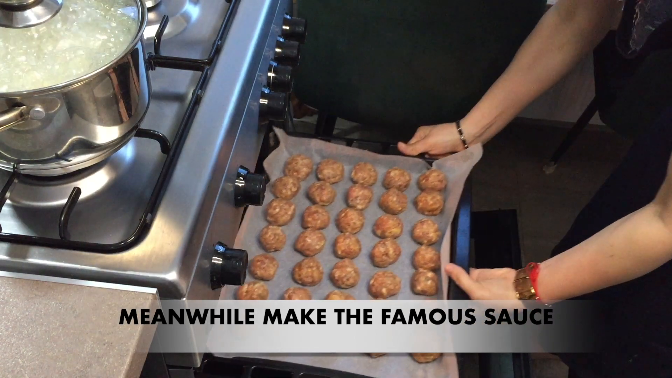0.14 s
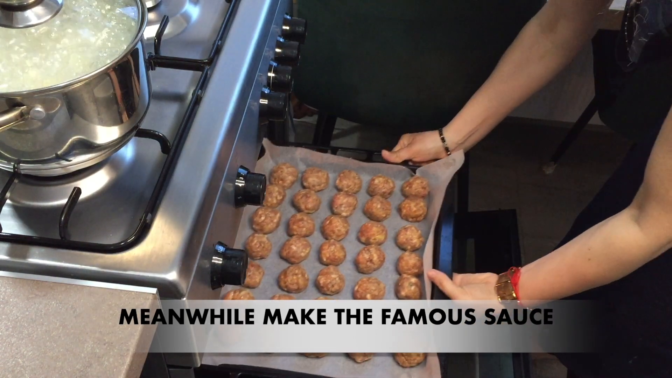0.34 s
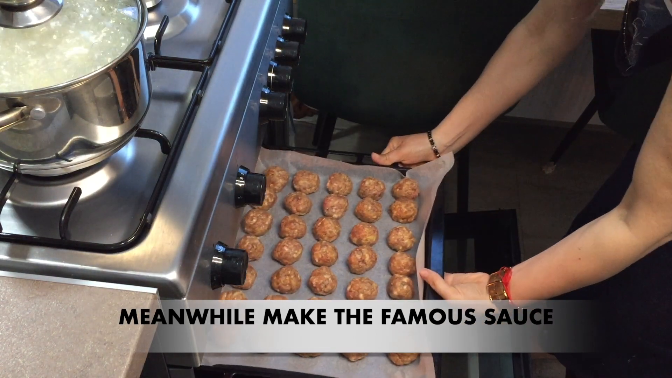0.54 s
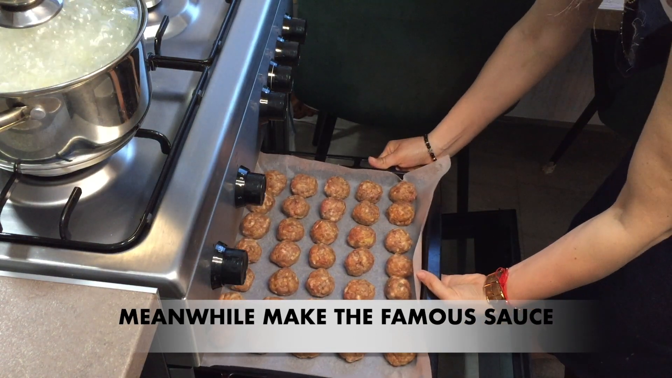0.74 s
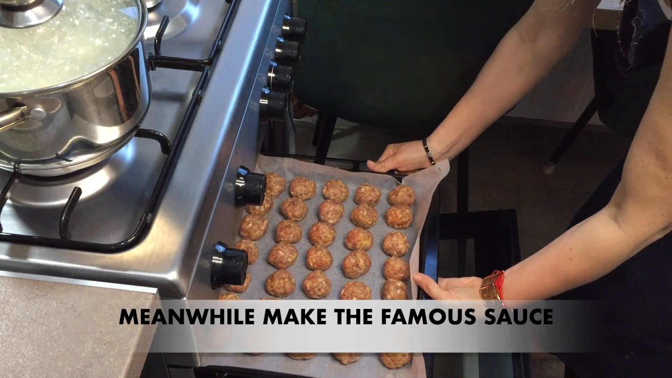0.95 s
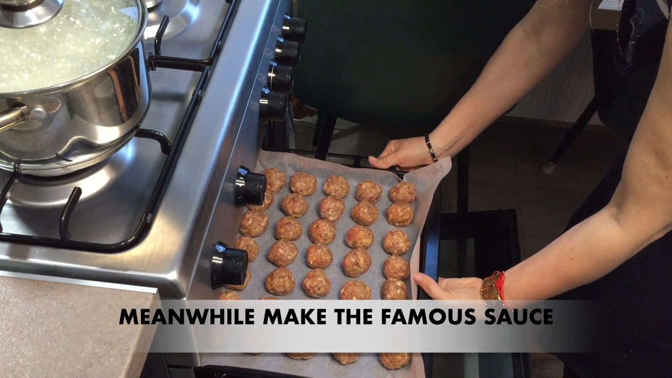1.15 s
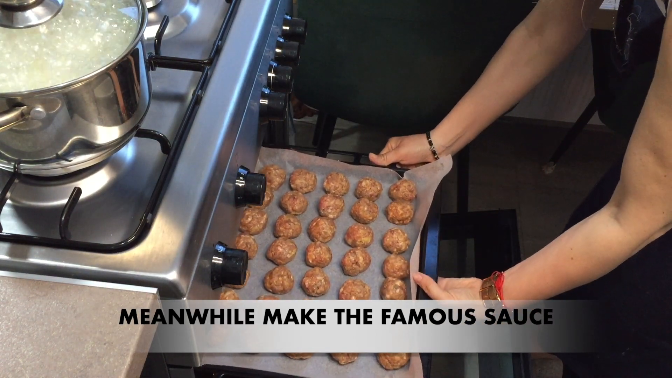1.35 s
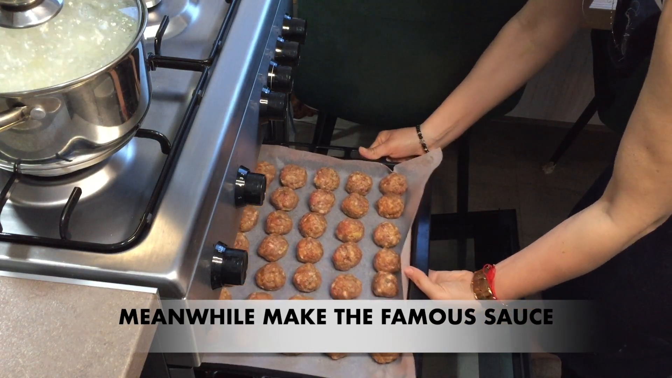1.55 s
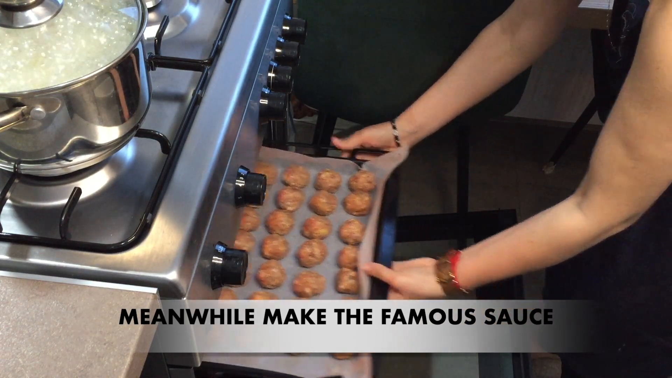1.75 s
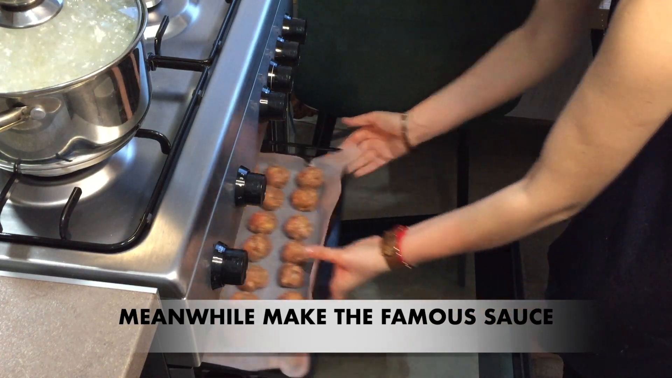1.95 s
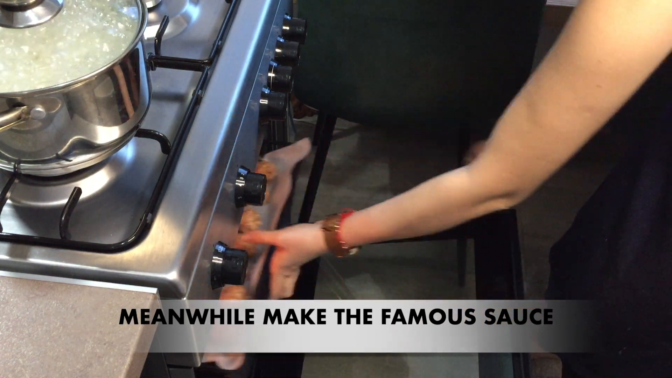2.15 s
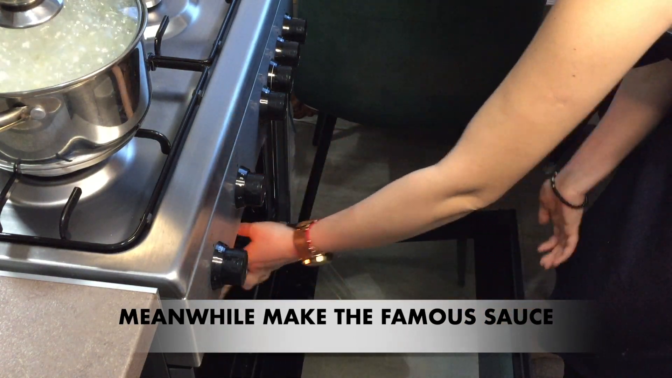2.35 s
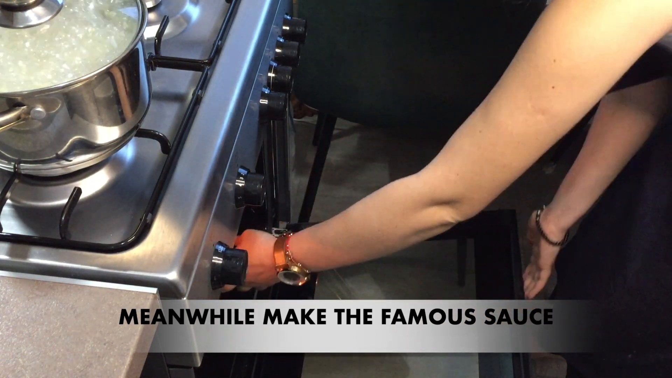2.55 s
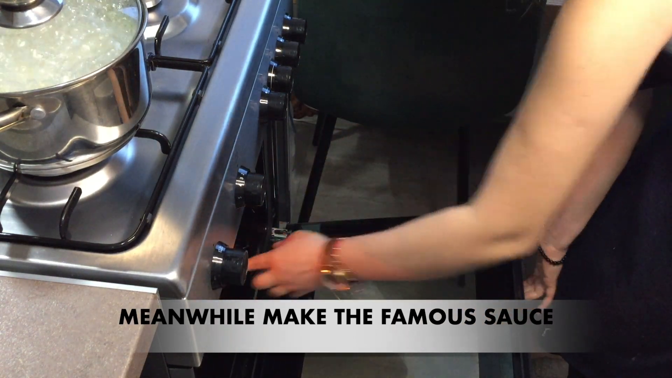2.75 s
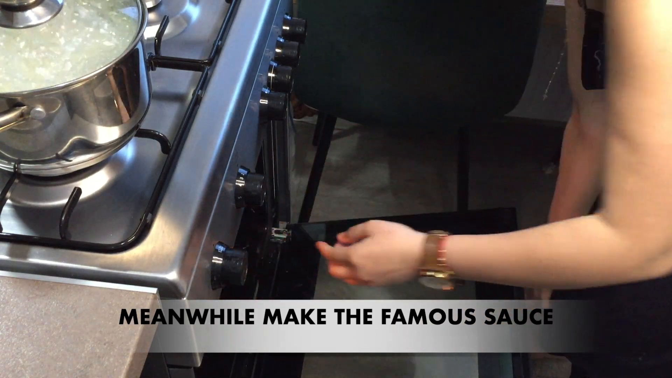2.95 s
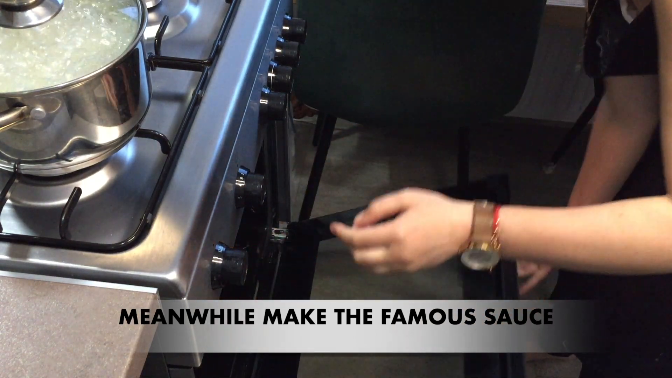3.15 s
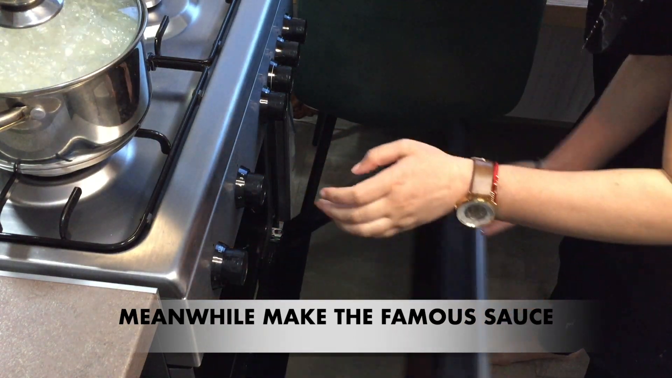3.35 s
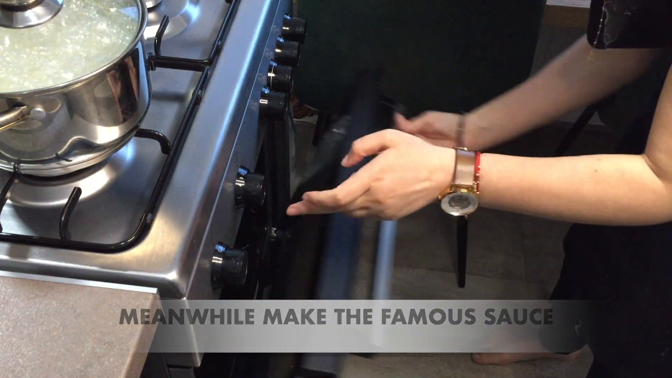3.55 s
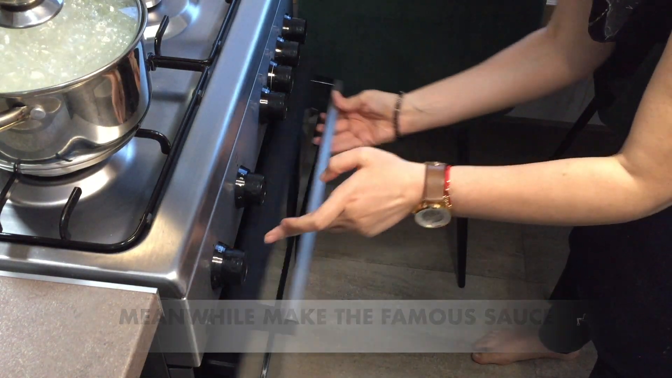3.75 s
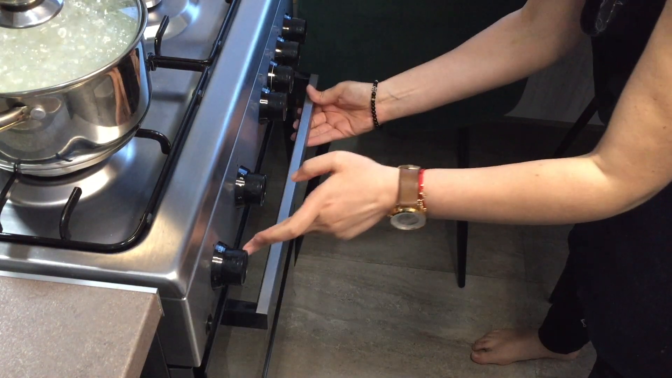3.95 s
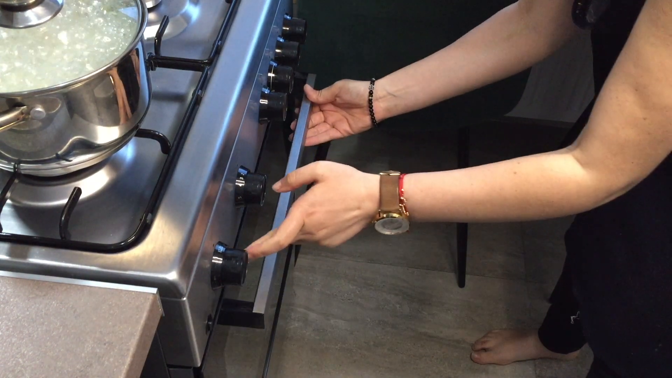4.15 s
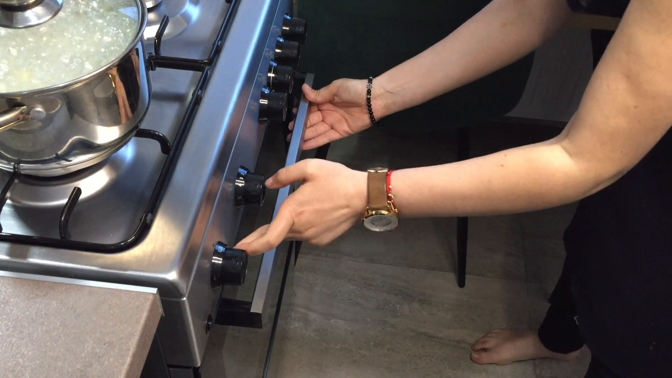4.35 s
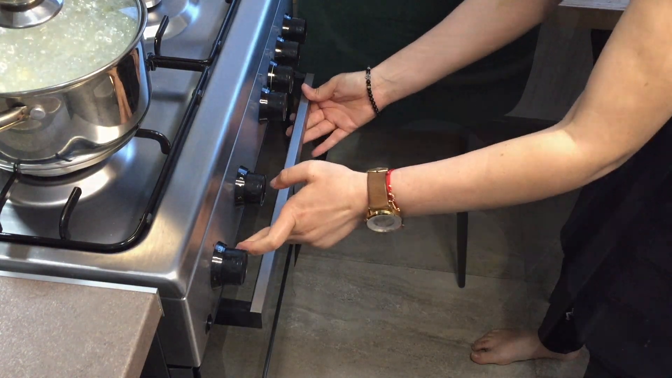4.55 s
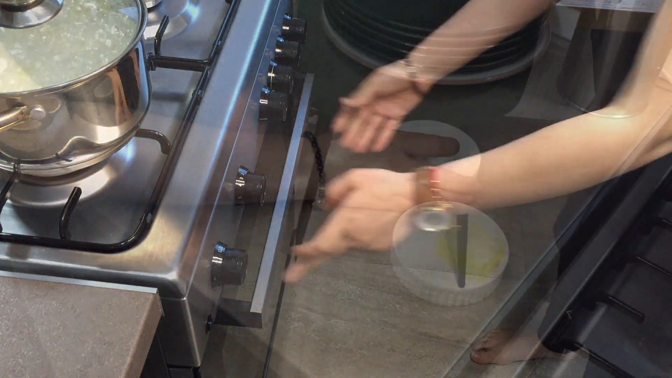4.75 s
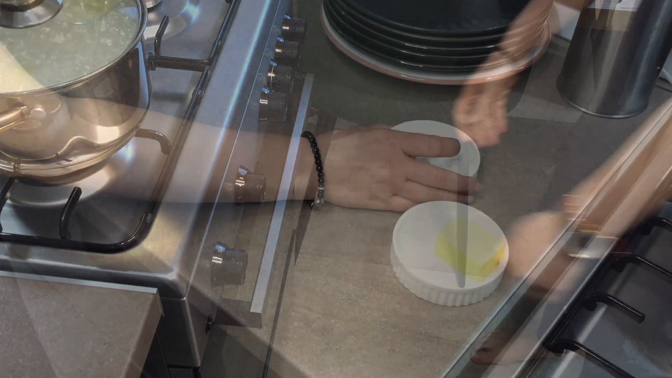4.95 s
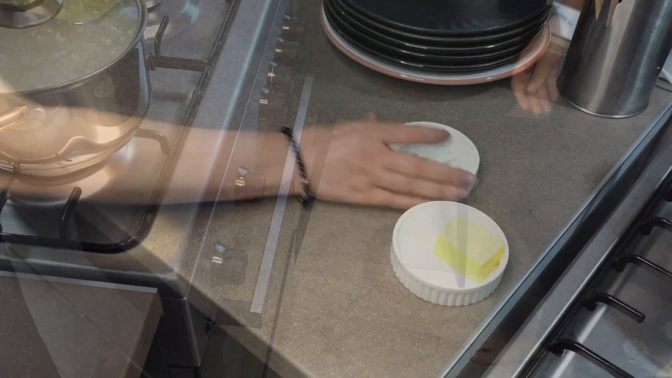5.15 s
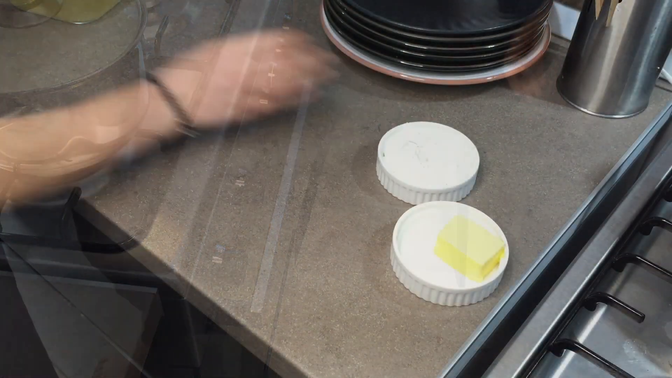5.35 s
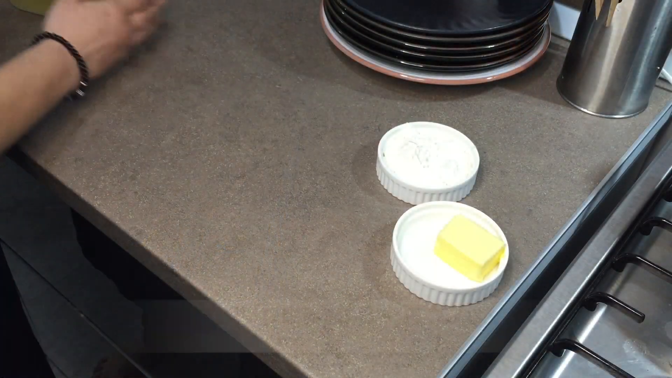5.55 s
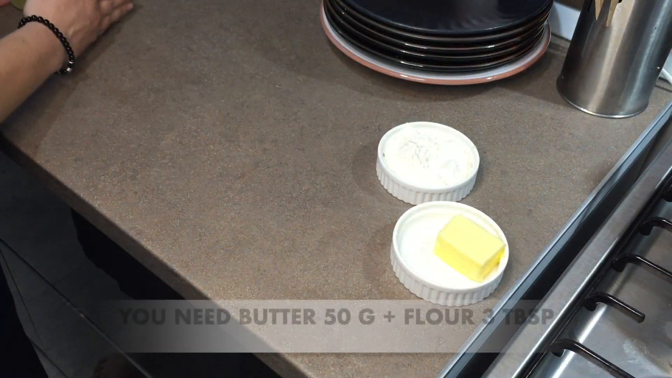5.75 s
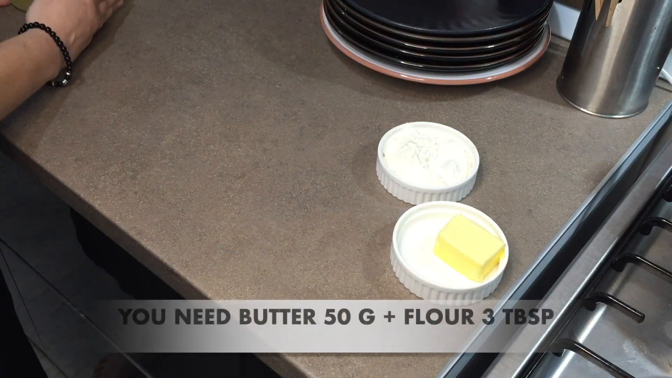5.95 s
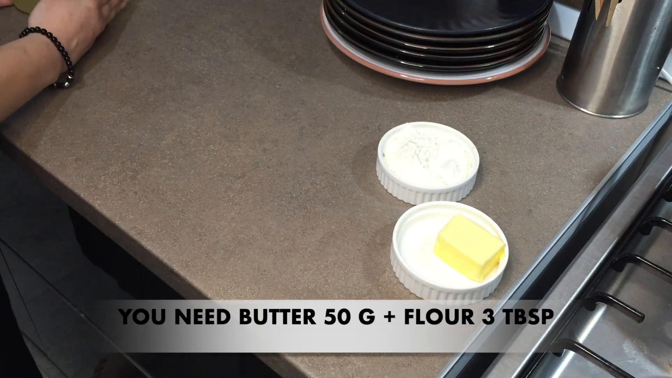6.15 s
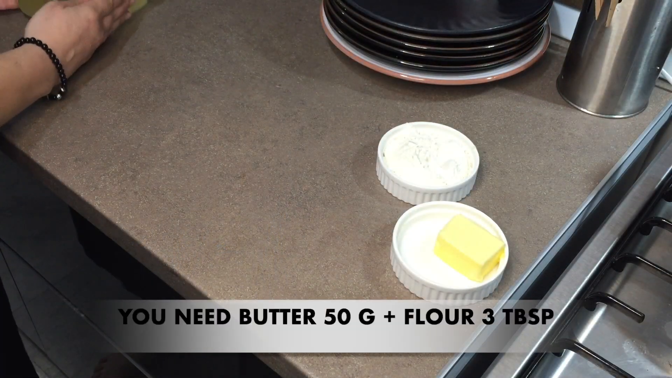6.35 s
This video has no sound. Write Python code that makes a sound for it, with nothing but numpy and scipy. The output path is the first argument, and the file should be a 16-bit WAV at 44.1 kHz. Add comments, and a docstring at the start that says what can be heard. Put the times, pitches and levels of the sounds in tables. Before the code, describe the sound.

A steel baking tray knocks and scrapes along an oven rack, ringing and squeaking faintly as it slides in. The hinge rubs briefly, the door thuds shut and its catch clanks. A plastic knob clicks twice, then a low electrical hum fades in, with a faint brush of a hand and a small dish nudged on the counter. One microphone picks it up in a hard-walled kitchen with a soft background hiss.

```python
"""Baking tray into the oven

A steel tray knocks, scrapes and faintly squeaks along the rack, ringing its sheet and the oven box.
The hinge rubs, the door thuds shut, its catch clanks and a knob clicks twice. Mains hum fades in
over the kitchen's murmur; a hand brushes the counter and a small dish is nudged, with a faint click.
One microphone, hard walls."""
import sys
import numpy as np
from scipy import signal
from scipy.fft import rfft, irfft, next_fast_len
from scipy.io import wavfile
from scipy.ndimage import uniform_filter1d, map_coordinates

SR = 44100
rng = np.random.default_rng(int(sys.argv[2]) if len(sys.argv) > 2 else 0)


def dump(signal):
    """Clip the signal to [-1, 1] and save it as 16-bit WAV at the path in sys.argv[1]."""
    limited = np.clip(np.atleast_2d(signal).T, -1, 1)
    pcm = np.round(limited * 32767).astype(np.int16)
    wavfile.write(sys.argv[1], SR, pcm)


N = 282989

# oven box modes: f/Hz, width/Hz, level/dB
OVEN_MODES = [(103, 11.7, 4.5), (139.6, 12, 1.5), (189.4, 12, -1), (272, 89, -3), (365.7, 10.7, -1.5)]


def amp(db):
    """dB to gain."""
    return 10 ** (np.asarray(db) / 20)


def unit(x):
    """Scale to rms 1."""
    return x / np.sqrt(np.mean(x ** 2) + 1e-20)


def along(points, hz):
    """Interpolate (f/Hz, value) points on a log axis."""
    f, v = np.transpose(points)
    return np.interp(np.log(hz + 1), np.log(f + 1), v)


def wobble(rate_hz):
    """Smooth random curve, rate_hz knots a second."""
    knots = rng.standard_normal(int(N * rate_hz / SR) + 4)
    return map_coordinates(knots, [np.arange(N) * rate_hz / SR])


def envelope(start_s, length_s, rise_s, fall_s):
    """Linear rise, hold, exponential release."""
    t = np.arange(N) / SR - start_s
    return np.clip(t / rise_s, 0, 1) * np.exp(-np.clip(t - length_s, 0, None) / fall_s)


def filtered(x, response):
    """Apply a complex frequency response."""
    m = next_fast_len(x.shape[-1] + SR // 2)
    return irfft(rfft(x, m) * response(np.fft.rfftfreq(m, 1 / SR)), m)[..., :x.shape[-1]]


def resonances(peaks):
    """Response of (f/Hz, width/Hz, level/dB) resonators, alternating in sign."""
    return lambda f: sum((-1) ** k * amp(db) * 1j * f * w / (c * c - f * f + 1j * f * w)
                         for k, (c, w, db) in enumerate(peaks))


def minimum_phase(gain):
    """Shortest impulse response with this gain on an FFT grid."""
    cepstrum = irfft(np.log(gain + 1e-6))
    half = len(cepstrum) // 2
    cepstrum[1:half] *= 2
    cepstrum[half + 1:] = 0
    return irfft(np.exp(rfft(cepstrum)))


def dying_noise(gain, t60_s, size):
    """Coloured noise; each octave decays at its own rate."""
    hz, t = np.fft.rfftfreq(size, 1 / SR), np.arange(size) / SR
    centres_hz = 62.5 * 2. ** np.arange(9)
    share = np.clip(1 - abs(np.log2((hz + 1) / centres_hz[:, None])), 0, 1)
    bands = irfft(rfft(rng.standard_normal(size)) * gain(hz) * share, size)
    return np.sum(bands * amp(-60 * t / t60_s(centres_hz)[:, None]), axis=0)


def patchy(x, depth_db):
    """Random patches of gain over time and frequency."""
    z = signal.stft(x, nperseg=512)[2]
    field = uniform_filter1d(rng.standard_normal(z.shape), size=5, axis=-2)
    field = uniform_filter1d(field, size=10, axis=-1)
    return signal.istft(z * amp(depth_db * unit(field)), nperseg=512)[1][..., :N]


def position(start_s=4.32, length_s=0.97):
    """Listener's move: 0 by the stove, 1 by the counter."""
    return np.clip((np.arange(N) / SR - start_s) / length_s, 0, 1)


def coupling_db(s, mouth_db=-6, enter_s=1.23, length_s=0.39):
    """The lowest box modes speak less while the tray is at the oven's mouth."""
    return mouth_db * (1 - np.clip((s - enter_s) / length_s, 0, 1))


def kitchen(x, wet_db):
    """Add wall reverberation; things move, so each 0.2 s gets a new tail."""
    # room decay: f/Hz, t60/s
    room_t60 = [(100, 0.97), (500, 0.73), (2000, 0.68), (6000, 0.48), (14000, 0.21)]
    step, predelay, wet = SR // 5, 90, np.zeros(N + 2 * SR)
    for start in range(0, N, step):
        block = x[start:start + step]
        if block.any():
            impulse = dying_noise(np.ones_like, lambda hz: along(room_t60, hz), size=28800)
            tail = signal.fftconvolve(block, impulse / np.linalg.norm(impulse))
            wet[start + predelay:][:len(tail)] += tail
    return x + amp(wet_db) * wet[:N]


def murmur(stove_db=-57, counter_db=-60.5, settle_s=0.13):
    """Gas and simmering by the stove give way to a thinner hush by the counter."""
    # air by the stove: f/Hz, density/dB
    stove_spectrum = [(25, -30), (45, -2), (80, -8), (135, 1.5), (206, -11), (301, -5.5), (451, -17.5),
                      (624, -12), (1290, -14), (2600, -21.5), (3600, -32.5), (7000, -38.5), (16000, -47.5)]
    # air by the counter: f/Hz, density/dB
    hush_spectrum = [(25, -22), (55, -3), (250, -8.5), (450, -14), (1050, -8.5), (1400, -14.5),
                     (2500, -21.5), (4200, -35), (16000, -42)]
    stove_noise, hush_noise = patchy(rng.standard_normal((2, N)), depth_db=1.4)
    gas = unit(filtered(stove_noise, lambda hz: amp(along(stove_spectrum, hz))))
    gas *= amp(stove_db - 2 * np.exp(-np.arange(N) / SR / settle_s))
    hush = amp(counter_db) * unit(filtered(hush_noise, lambda hz: amp(along(hush_spectrum, hz))))
    return np.sqrt(1 - position()) * gas + np.sqrt(position()) * hush


def hum(hum_hz=100, octave_db=-59, drone_db=-54.5):
    """Twice the mains frequency and its octave, unsteady, over a low lumpy drone."""
    # fundamental's swell: t/s, level/dB
    swell = [(4.25, -67), (4.45, -52), (4.8, -48), (5.6, -53.5), (6.42, -50.5)]
    t = np.arange(N) / SR
    times_s, levels_db = np.transpose([(swell[0][0] - .1, -90)] + swell)
    phase = 2 * np.pi * hum_hz * t + .3 * wobble(5)
    fundamental = amp(np.interp(t, times_s, levels_db) + wobble(12)) * np.sin(phase)
    octave = position() * amp(octave_db + 1.6 * wobble(10)) * np.sin(2 * phase)
    frame = resonances([(136.5, 22.3, 0), (187, 24, -2.5), (270, 42, -8.5)])
    drone = unit(filtered(rng.standard_normal(N), lambda hz: frame(hz) ** 2))
    return np.sqrt(2) * (fundamental + octave) + position() * amp(drone_db) * drone


def hand_brush(peak_s=5.21, level_db=-60, rise_s=0.034, fall_s=0.0088):
    """Skin rubs the counter: a hiss that swells and stops."""
    # skin friction: f/Hz, density/dB
    skin_spectrum = [(1800, -10), (3500, -5), (6000, -11), (10000, -28)]
    friction = rng.standard_normal(N) * amp(2.5 * wobble(120))
    hiss = unit(filtered(friction, lambda hz: amp(along(skin_spectrum, hz))))
    t = np.arange(N) / SR - peak_s
    return amp(level_db) * np.exp(np.where(t < 0, t / rise_s, -t / fall_s)) * hiss


def dish_nudge(cutoff_hz=900):
    """Soft pushes on a dish make the counter thump."""
    # bumps: t/s, relative level/dB
    bumps = [(6.217, -33), (6.288, -26), (6.35, -29)]
    # worktop modes: f/Hz, width/Hz, level/dB
    counter_modes = [(201, 37, 4.5), (410, 60, -7), (574, 56, -4), (950, 41, -13)]
    push, window = np.zeros(N), np.hanning(3600)
    for s, db in bumps:
        burst = rng.standard_normal(len(window)) * window
        push[round(s * SR) - 1500:][:len(burst)] += amp(db + 3) * burst
    return filtered(push, lambda hz: resonances(counter_modes)(hz) / (1 + 1j * hz / cutoff_hz) ** 2)


def clicks(chatter_s=0.002, clunk_rise_s=0.0018, clunk_t60_s=0.14):
    """Plastic snaps with brief chatter, then a duller clunk from the housing."""
    # clicks: t/s, peak/dB, relative clunk/dB, chatter/0-1, clunk pitch/ratio
    events = [(4.394, -16.5, -32.5, 0.14, 3.35), (4.638, -33, -15, 0.32, 1), (6.153, -50.5, -8, 0.45, 1)]
    # plastic snap: f/Hz, density/dB
    snap_spectrum = [(1100, -20), (2050, -3.5), (2700, -25), (5500, 3), (7500, 2), (11000, -5),
                     (16500, -9.5)]
    # housing modes: f/Hz, width/Hz, level/dB
    housing_modes = [(295, 92, 21), (603, 133, 18), (1040, 350, 9)]
    out, t = np.zeros(N + SR), np.arange(SR // 4 - 1) / SR
    snap_impulse = minimum_phase(amp(along(snap_spectrum, np.fft.rfftfreq(len(t), 1 / SR))))
    housing = resonances(housing_modes)
    for s, db, clunk_db, chatter, pitch in events:
        contact = (t == 0) + rng.standard_normal(len(t)) * chatter * np.exp(-t / chatter_s)
        snap = signal.fftconvolve(contact, snap_impulse)[:len(t)]
        rattle = rng.standard_normal(len(t)) * amp(-60 * t / clunk_t60_s)
        rattle *= 1 - np.exp(-t / clunk_rise_s)
        clunk = filtered(rattle, lambda hz: housing(hz / pitch) * (hz / (hz + 300 * pitch)) ** 2)
        click = snap / abs(snap).max() + amp(clunk_db) * clunk / np.std(clunk[:1500])
        out[round(s * SR):][:len(t)] += amp(db) * click
    return out[:N]


def blows(hits, modes, spectrum, rise_s, boom_rise_s, t60_scale, bass_db, body_db):
    """Struck steel: clear modes at random strengths, a haze of close ones, the oven box's boom."""
    # decay of haze and boom: f/Hz, unscaled t60/s
    steel_t60 = [(100, 0.14), (500, 0.23), (2000, 0.13), (6000, 0.083), (14000, 0.056)]
    out, t, box = np.zeros(N + SR), np.arange(SR // 2) / SR, resonances(OVEN_MODES)
    t60_s = lambda hz: t60_scale * along(steel_t60, hz)
    for s, db, boom_db, edge_db, clang_db in hits:
        body = [(1100, body_db + min(boom_db, 0)), (1700, 0)]  # heavy contact fills the low modes
        edge = [(3500, 0), (6000, edge_db - along(spectrum, 5130))]  # hard contact adds treble
        haze = dying_noise(lambda hz: amp(along(spectrum, hz) + along(body + edge, hz)), t60_s, len(t))
        bass = [(100, bass_db + coupling_db(s)), (400, 0)]
        boom = dying_noise(lambda hz: abs(box(hz)) * amp(along(bass, hz)), t60_s, len(t))
        boom *= 1 - np.exp(-t / boom_rise_s)
        boom *= amp(boom_db + coupling_db(s)) / np.std(boom[:2000])
        draws = rng.standard_normal((len(modes), 2))
        drifts = np.cumsum(.006 * rng.standard_normal((len(modes), len(t))), axis=1)  # loose contact
        clang = np.zeros(len(t))
        for (hz, mode_db, mode_t60_s), (strength, phase), drift in zip(modes, draws, drifts):
            ring_db = mode_db + along(body, hz) / 2 + 3.6 * strength - 60 * t / mode_t60_s
            clang += amp(ring_db) * np.sin(2 * np.pi * (hz * t + phase + drift))
        strike = (haze / np.std(haze[:400]) + amp(clang_db) * clang) * (1 - np.exp(-t / rise_s))
        out[round(s * SR):][:len(t)] += amp(db - 9.5) * (strike + boom)
    return out[:N]


def hinge(level_db=-51.5):
    """A short rub through the hinge's resonances as the door lifts."""
    # hinge modes: f/Hz, width/Hz, level/dB
    hinge_modes = [(340, 42, 5.5), (1020, 190, -1.5), (1880, 500, -12), (3600, 300, -16.5),
                   (6960, 2400, -28)]
    rub = unit(filtered(rng.standard_normal(N) * amp(1.4 * wobble(60)), resonances(hinge_modes)))
    return amp(level_db) * envelope(start_s=3.268, length_s=0.06, rise_s=0.0026, fall_s=0.012) * rub


def door():
    """The heavy panel slams and rebounds."""
    # impacts, relative levels: t/s, level/dB, boom/dB, edge/dB, clang/dB
    slams = [(3.5, -26, -6.5, -19.5, -12.5), (3.527, -36.5, 4.5, -17, -3.5), (3.622, -51, 14, -20, -16),
             (3.688, -54, 7, -13, -9)]
    # clear panel modes: f/Hz, level/dB, t60/s
    panel_modes = [(370, 0, 0.25), (546, -0.5, 0.28), (837, 0.5, 0.39), (940, -3, 0.3), (1714, -1, 0.16)]
    # close panel modes: f/Hz, density/dB
    panel_spectrum = [(200, -18), (450, 0.5), (800, -8), (1360, -11.5), (3430, -12.5), (16000, -30)]
    return blows(slams, panel_modes, panel_spectrum,
                 rise_s=0.0011, boom_rise_s=0.012, t60_scale=1.08, bass_db=7, body_db=4.5)


def door_catch():
    """The catch springs home and bounces."""
    # impacts, relative levels: t/s, level/dB, boom/dB, edge/dB, clang/dB
    clanks = [(3.894, -22, -21.5, -26.5, -3), (3.923, -28, -16, -31, -6), (4.0985, -54.5, 7.5, -4, -10)]
    # clear spring modes: f/Hz, level/dB, t60/s
    spring_modes = [(670, -14, .12), (1515, -8, .09), (1747, -7, .14), (1960, -10, .1), (2509, -4, .1),
                    (2584, 2, .07), (3083, 1, .06), (3200, 2, .08), (3450, -5, .08), (3730, -9, .07),
                    (4290, -7, .09)]
    # close spring modes: f/Hz, density/dB
    spring_spectrum = [(300, -32), (700, -10.5), (1140, -15.5), (2000, -9), (3000, -4.5), (4300, -6.5),
                       (4800, -15.5), (6500, -9.5), (16000, -25)]
    return blows(clanks, spring_modes, spring_spectrum,
                 rise_s=0.0045, boom_rise_s=0.0034, t60_scale=0.75, bass_db=-2, body_db=19)


def squeaks():
    """Faint broken whistles where steel rubs steel."""
    # whistles: t/s, length/s, f/Hz, level/dB
    whistles = [(.85, .13, 4870, -73), (2.64, .14, 4095, -73), (2.64, .12, 6840, -76),
                (2.84, .12, 3680, -79), (3.69, .17, 6570, -85)]
    out, t = np.zeros(N), np.arange(N) / SR
    for s, length_s, hz, db in whistles:
        swell = np.sin(np.pi * np.clip((t - s) / length_s, 0, 1))
        out += amp(db + 6 * wobble(40)) * swell * np.sin(2 * np.pi * hz * t + 1.1 * wobble(120))
    return out


def scrape(modes, spectrum, snag_rate_hz=700):
    """Tiny irregular snags on the rack's wires shake the sheet and the oven box."""
    # pushes: t/s, length/s, level/dB, relative boom/dB, relative edge/dB
    strokes = [(0.476, 0.34, -61, 4.5, -20), (1.043, 0.091, -63.5, 14, -52), (1.314, 0.042, -62.5, 5, -47),
               (1.66, 0.24, -50, -5.5, -9.5), (1.798, 0.14, -39.5, -3.5, -13), (1.929, 0.2, -45, 6.5, -8.5),
               (2.148, 0.3, -44.5, -3.5, -10), (2.488, 0.16, -60, 15.5, -2.5),
               (2.811, 0.051, -60, -7.5, -12.5)]
    snags = (rng.random(N) < snag_rate_hz / SR) * amp(3.1 * rng.standard_normal(N))
    snags *= rng.choice([-1, 1], N)
    friction = (.8 * unit(snags) + rng.standard_normal(N)) * amp(3.2 * wobble(35))
    rasp = patchy(friction, depth_db=2.5)
    rub = patchy(friction, depth_db=5)  # the contact wanders over the sheet
    sheet = lambda hz: amp(along(spectrum, hz))
    lowpass = lambda hz, cutoff_hz: 1 / (1 + (hz / cutoff_hz) ** 8)
    ringing = resonances([(hz, 80, db) for hz, db, _ in modes])
    body = unit(filtered(rub, lambda hz: sheet(hz) * lowpass(hz, 4200)))
    body += .3 * unit(filtered(patchy(snags, depth_db=5), ringing))
    edge = unit(filtered(rasp, lambda hz: sheet(hz) * (1 - lowpass(hz, 4200))))
    box_db = coupling_db(np.arange(N) / SR)
    belly = unit(filtered(rub, lambda hz: sheet(hz) * lowpass(hz, 1300)))
    belly *= amp(-11 - box_db)  # low sheet modes, freer while the tray overhangs
    box_low = filtered(rub, resonances(OVEN_MODES[:3]))
    box_high = filtered(rub, resonances(OVEN_MODES[3:]))
    boom = unit(amp(2 * box_db) * box_low - box_high)
    return sum(amp(db) * envelope(s, length_s, rise_s=0.06, fall_s=0.053)
               * (body + amp(boom_db) * (boom + belly) + amp(edge_db) * edge)
               for s, length_s, db, boom_db, edge_db in strokes)


def tray():
    """The thin steel sheet drags and knocks along the rack."""
    # impacts, relative levels: t/s, level/dB, boom/dB, edge/dB, clang/dB
    knocks = [(0.513, -49.5, 18, 0.5, -4), (0.636, -26.5, -4, -14.5, -19), (0.668, -34, 2.5, -17, -20),
              (0.8492, -32.5, -1.5, -46, -25), (1.5106, -52.5, 6.5, -6.5, -17),
              (1.5973, -25, -14.5, -15.5, -5.5), (1.8055, -28.5, 1.5, -20, -10),
              (1.8239, -19.5, -15, -11.5, -19), (1.9507, -21.5, -13, -14.5, -12),
              (1.9792, -22.5, -12.5, -14.5, -8), (2.02, -18, -13, -14, -8.5),
              (2.036, -21.5, -12.5, -36, -12), (2.112, -31, -15, -24, -15), (2.321, -30.5, -8.5, -9, -24),
              (2.5535, -36, -0.5, -41, -18)]
    # clear sheet modes: f/Hz, level/dB, t60/s
    sheet_modes = [(1137, -3, .2), (1594, -6, .15), (1875, 0, .06), (2165, 8, .045), (2240, -5, .2),
                   (2420, 1, .07), (2704, -8, .15), (3520, -11, .2), (5375, -14, .25)]
    # close sheet modes: f/Hz, density/dB
    sheet_spectrum = [(260, -35), (450, -4), (680, -2), (1260, -3), (2330, -2), (3050, -7.5), (8930, -15),
                      (16000, -21.5)]
    drag = scrape(sheet_modes, sheet_spectrum)
    return drag + blows(knocks, sheet_modes, sheet_spectrum,
                        rise_s=0.00071, boom_rise_s=0.0039, t60_scale=1, bass_db=-1, body_db=5)


def scene():
    """Contact sounds in the kitchen, over hum and murmur; mono."""
    contacts = tray() + door() + door_catch() + hinge() + squeaks() + hand_brush() + dish_nudge()
    in_room = kitchen(contacts, wet_db=-5) + kitchen(clicks(), wet_db=-3)
    low_cut_hz = 88.6  # steep low cut: knocks and clicks lose their deep bass
    low_cut = lambda hz: (hz * hz / (hz * hz - low_cut_hz ** 2 - 1.2j * hz * low_cut_hz)) ** 2
    return (filtered(in_room, low_cut) + hum() + murmur())[None]


def record(dry):
    """Brick-wall low-pass."""
    top_hz = 15850
    return filtered(dry, lambda hz: hz < top_hz)


dry = scene()
out = record(dry)
dump(out)
```